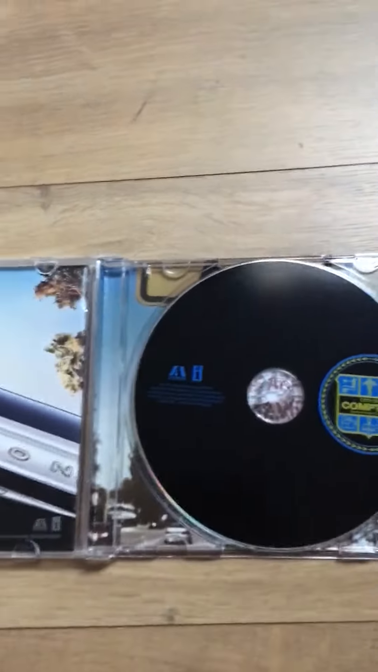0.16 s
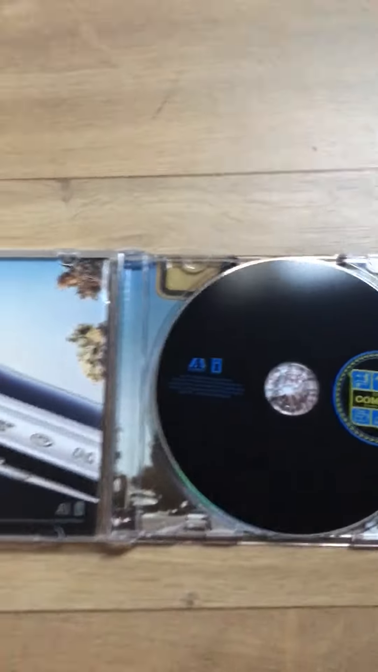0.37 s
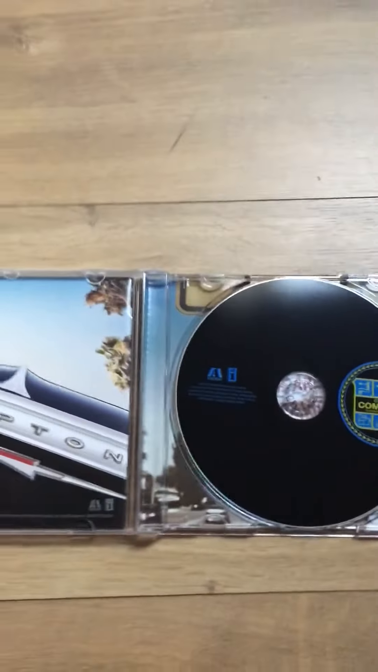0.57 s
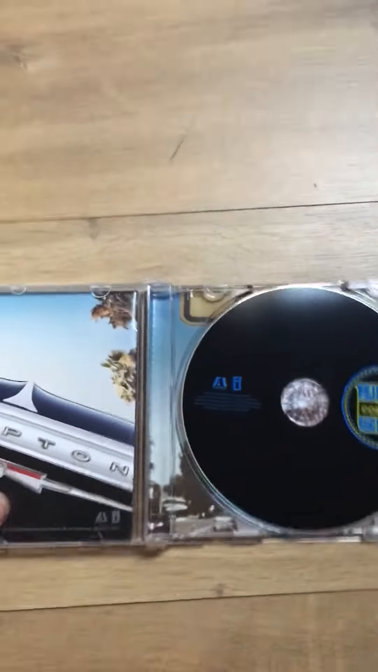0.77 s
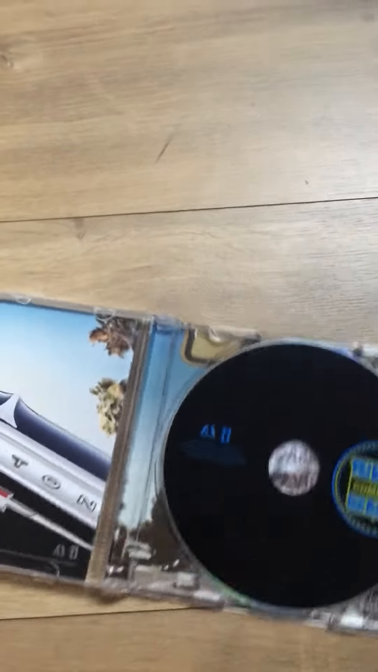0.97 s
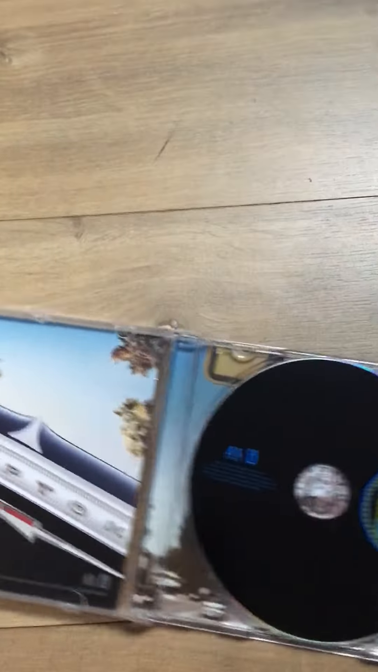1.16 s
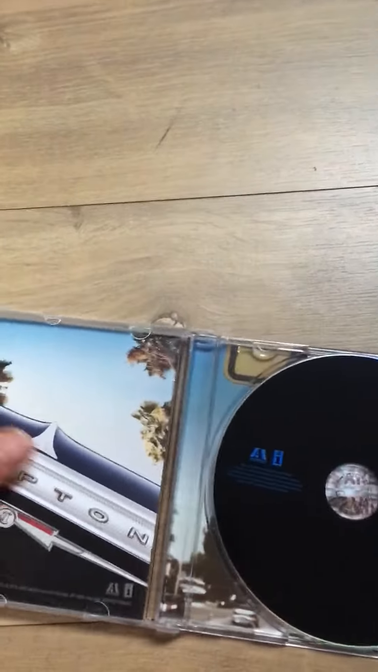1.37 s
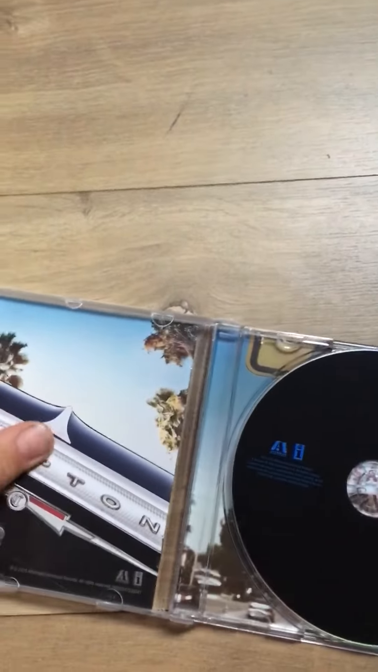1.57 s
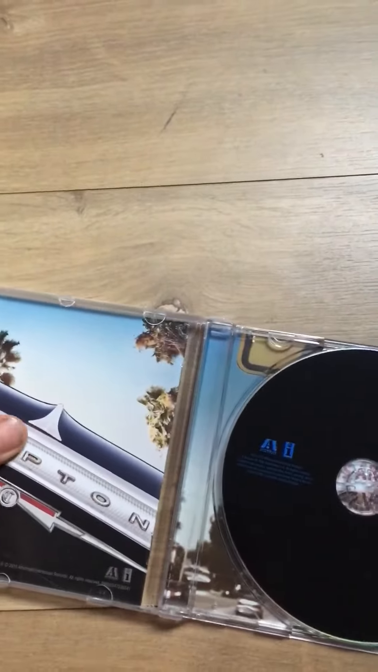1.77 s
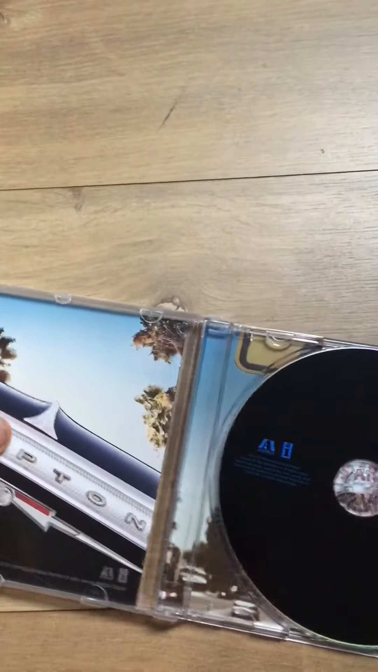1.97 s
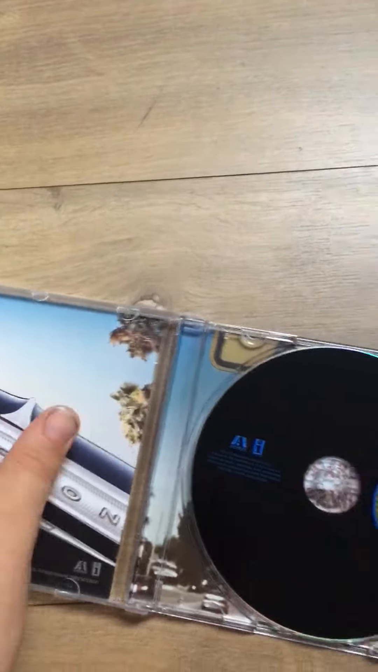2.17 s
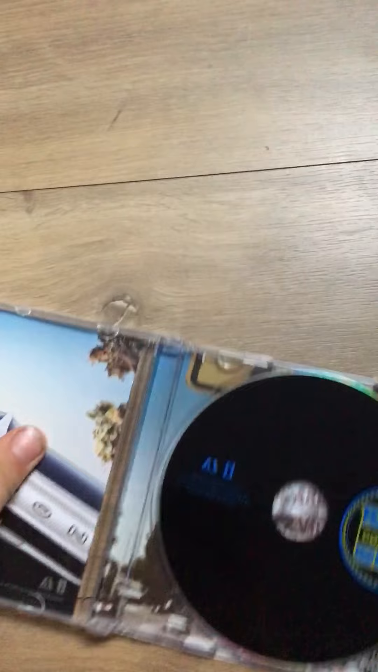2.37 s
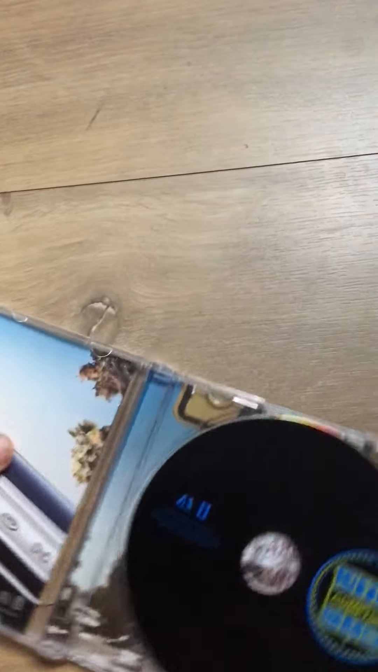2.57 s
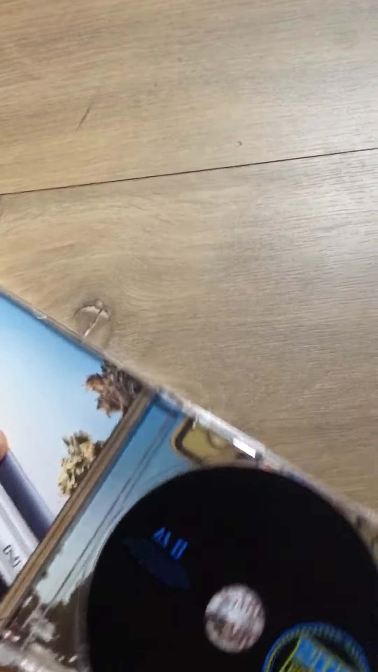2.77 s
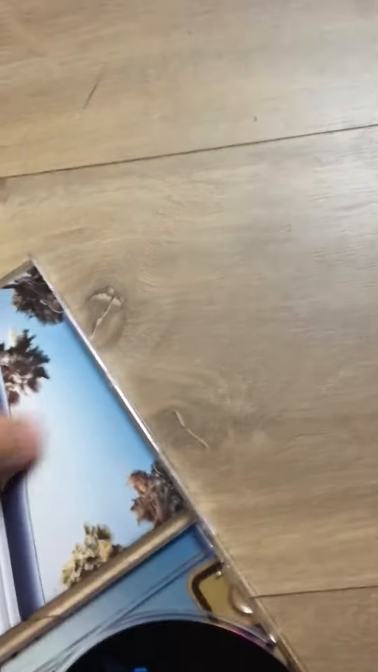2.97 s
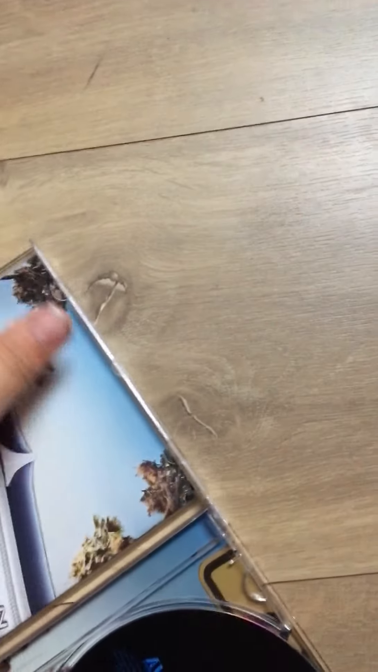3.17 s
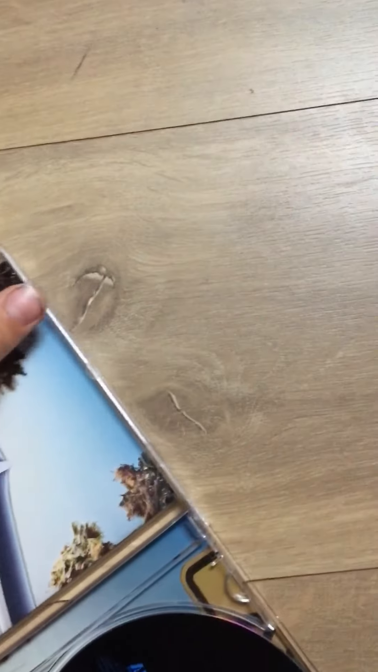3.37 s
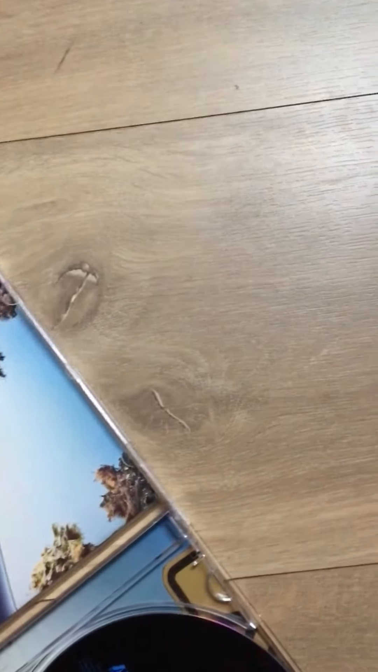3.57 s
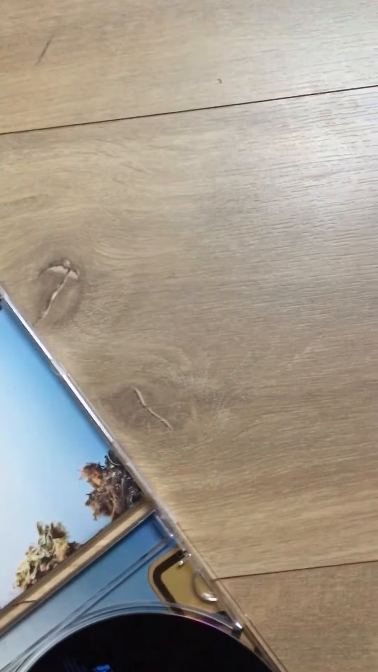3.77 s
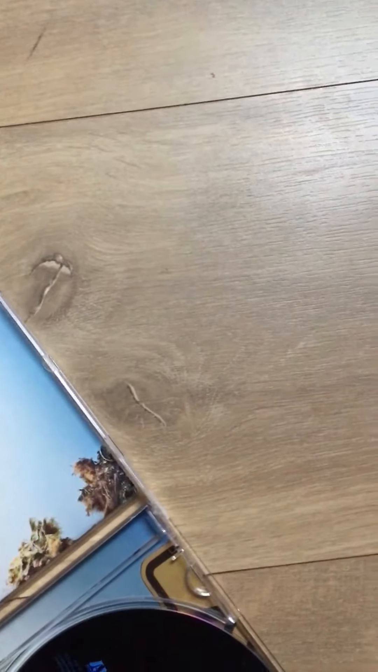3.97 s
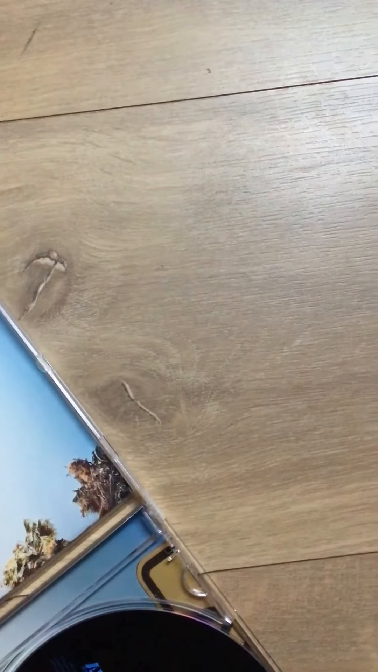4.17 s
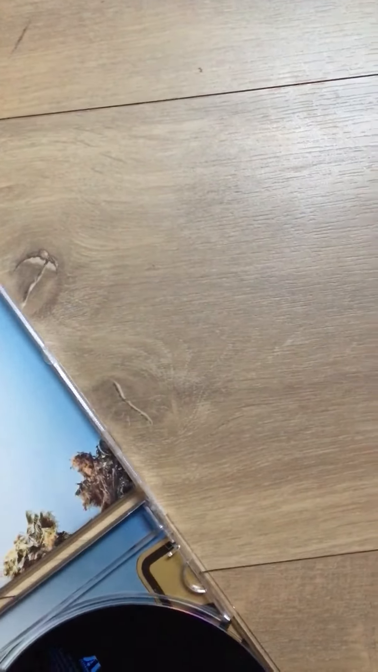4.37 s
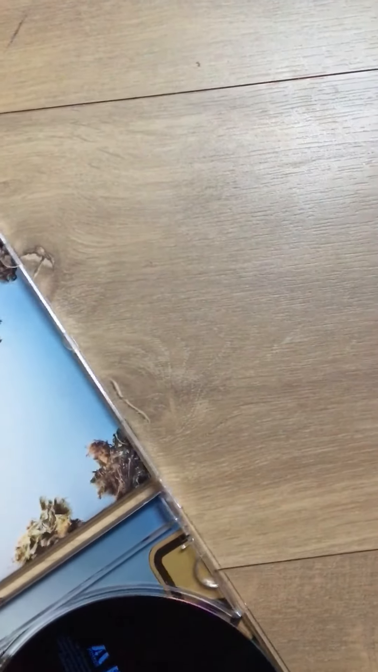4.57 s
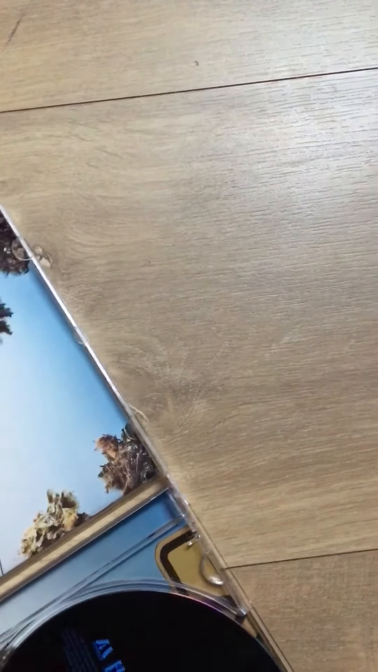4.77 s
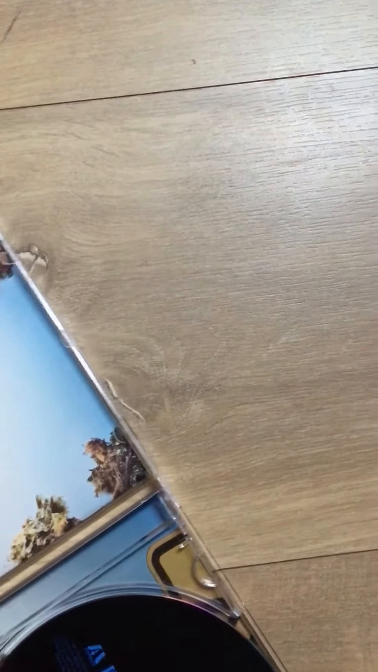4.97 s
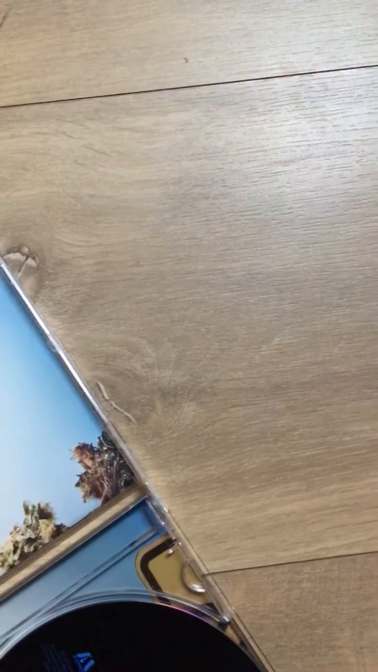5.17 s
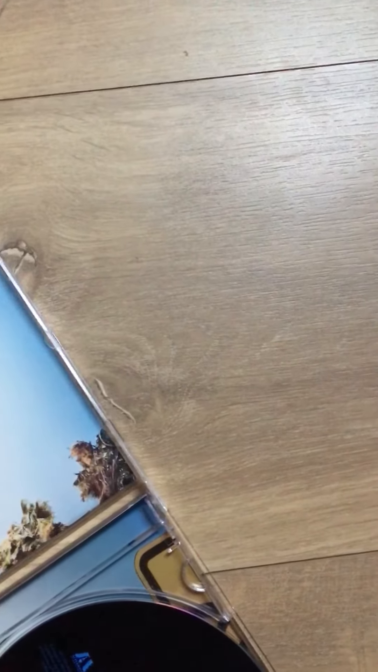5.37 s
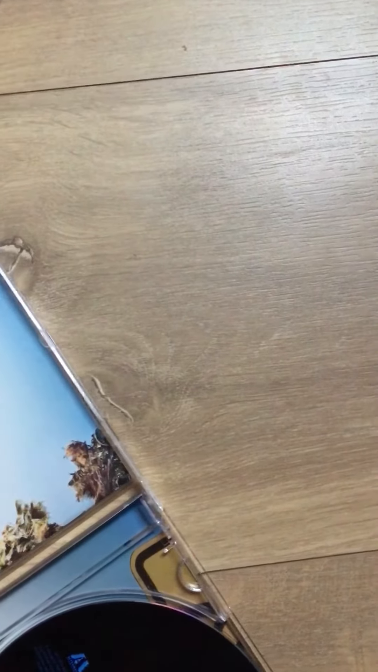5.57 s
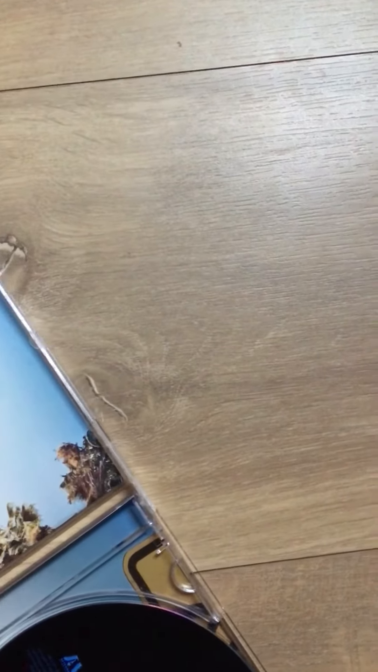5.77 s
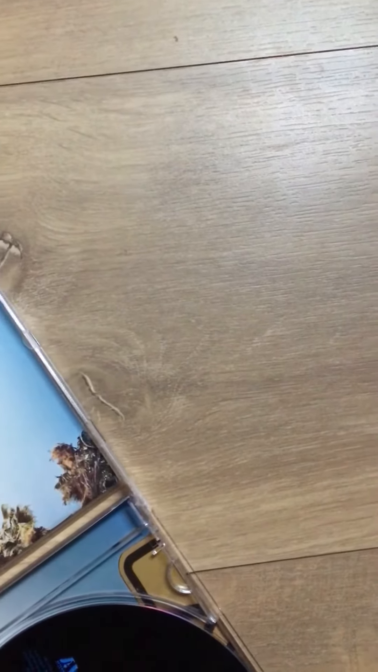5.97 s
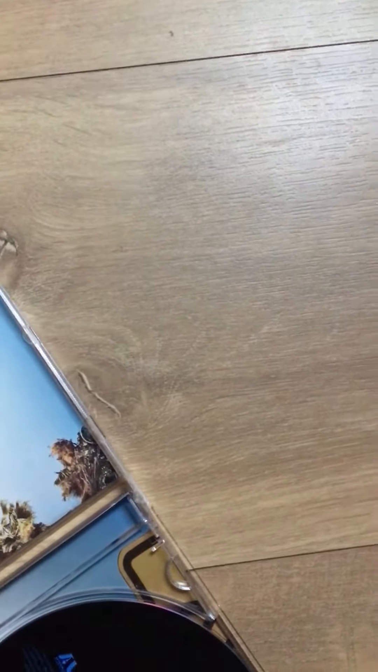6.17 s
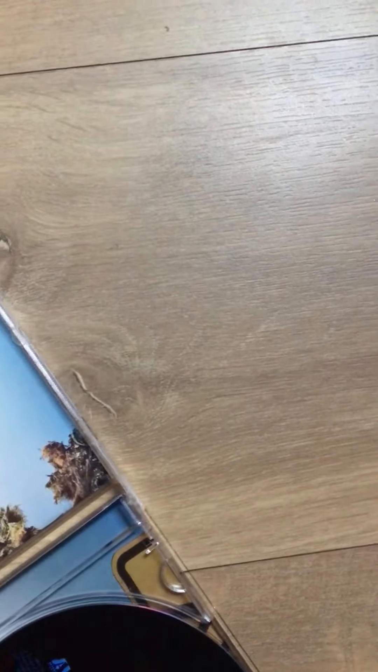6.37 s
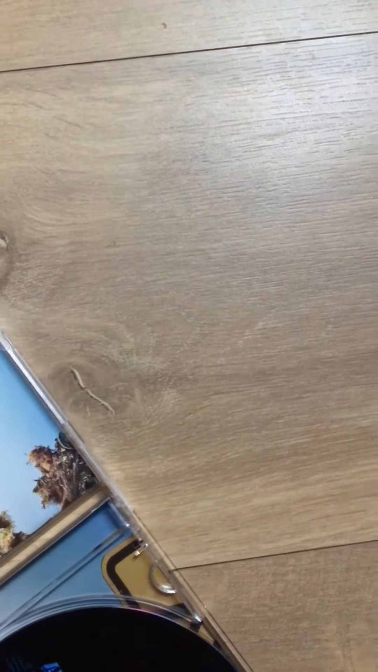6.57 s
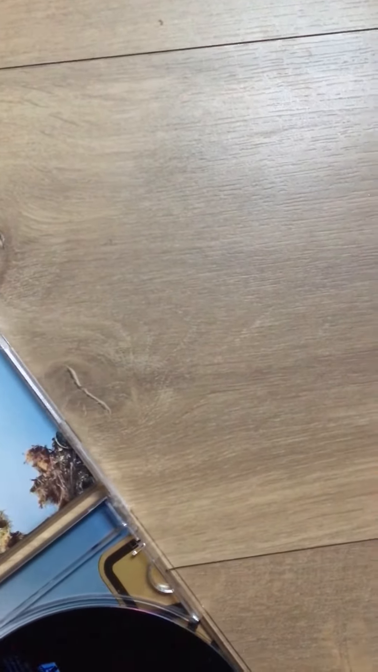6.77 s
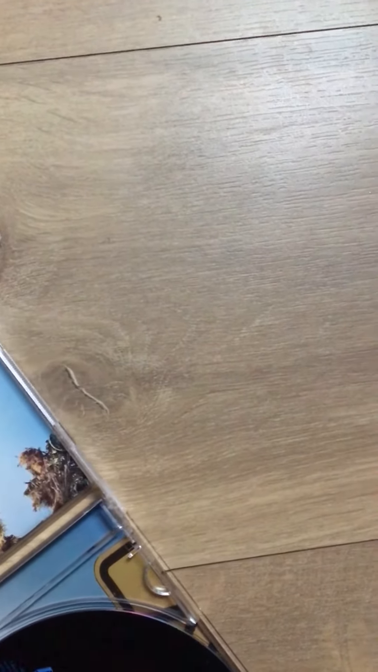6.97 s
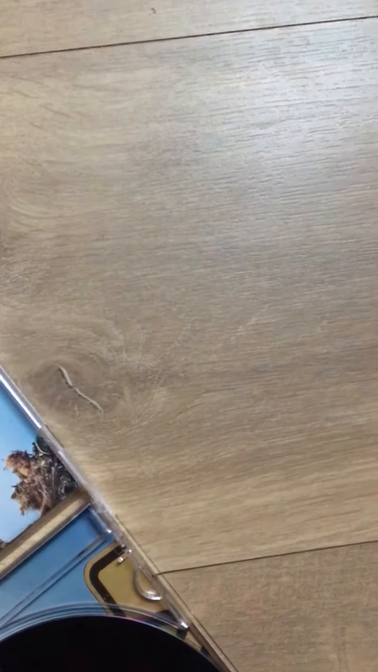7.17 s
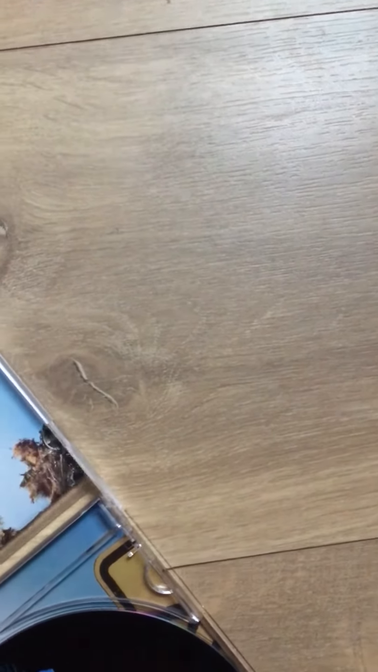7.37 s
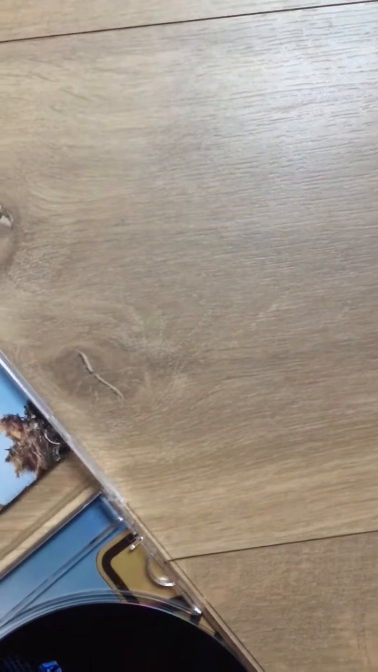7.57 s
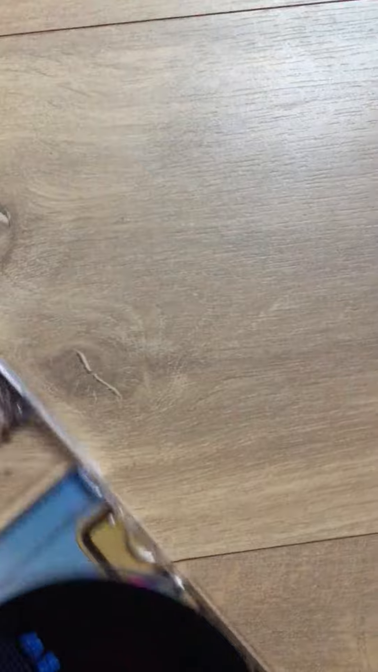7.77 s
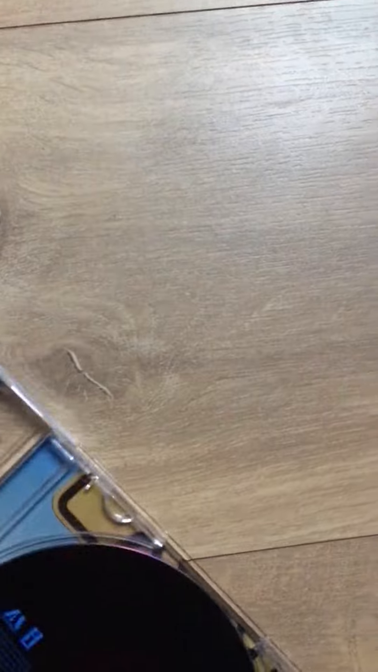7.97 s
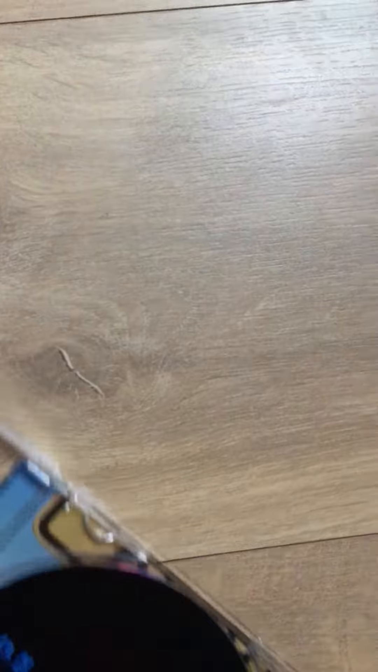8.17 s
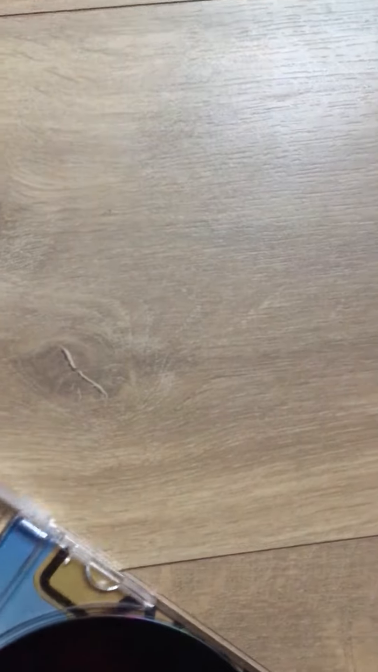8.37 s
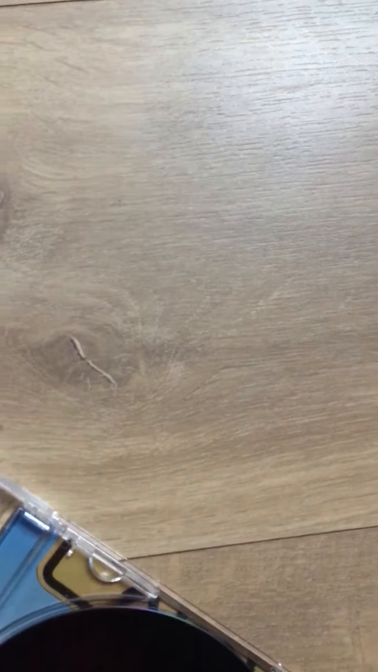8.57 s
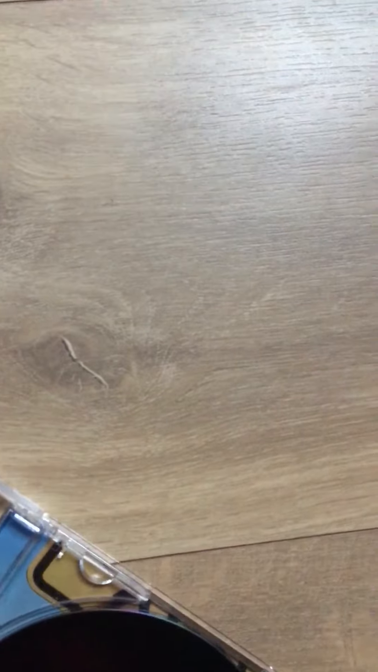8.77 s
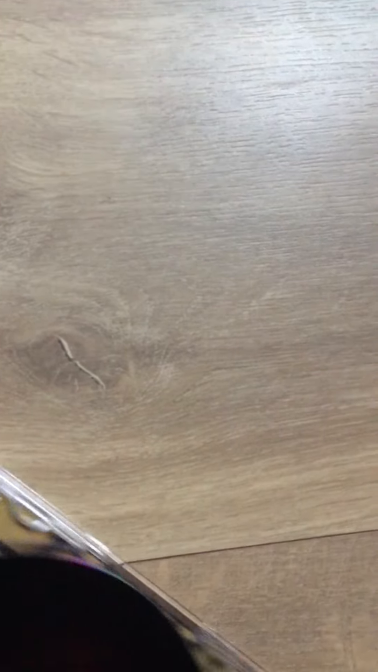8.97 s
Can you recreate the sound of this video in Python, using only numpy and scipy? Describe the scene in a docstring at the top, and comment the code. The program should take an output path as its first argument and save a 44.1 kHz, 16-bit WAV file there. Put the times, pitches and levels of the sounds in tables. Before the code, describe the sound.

Close up in a small, quiet room, a plastic disc case slides on a hard floor, first in brief strokes and then in a longer, louder push. Its tabs and hinge click irregularly while a paper booklet rubs softly against the plastic. A loud click stands out near the end, and fuller scrapes of paper and case follow. Soft knocks, faint ticking and a low room rumble lie underneath.

```python
"""An open plastic disc case is pushed over a laminate floor in short strokes and one long push.
Grit under it, and its paper booklet as fingers work it free, rub the plastic and make it ring.
Fingers and case bump the floor, tabs and hinge click, the case creaks and a slipping edge squeaks.
A small, quiet room echoes and rumbles, and the phone's microphone picks up faint ticks and hiss."""
import sys
import numpy as np
from scipy import signal
from scipy.fft import rfft, irfft, next_fast_len
from scipy.io import wavfile
from scipy.ndimage import uniform_filter1d, map_coordinates

SR = 44100
rng = np.random.default_rng(int(sys.argv[2]) if len(sys.argv) > 2 else 0)


def persist_wave(psi):
    """Save psi, clipped to +-1, as 16-bit WAV."""
    counts = np.round(np.clip(psi, -1, 1) * 32767).astype(np.int16)
    wavfile.write(sys.argv[1], SR, np.atleast_2d(counts).T)


N = 398223
NOISE_TOP_HZ = 15750  # upper limit of grit, hiss and ticks
CHATTER_S = 0.023  # typical time for a knock or click to fade by 60 dB


def amp(db):
    """Turn decibels into a number to multiply by."""
    return 10 ** (np.asarray(db) / 20)


def unit(x):
    """Scale x to an average (rms) level of 1."""
    return x / np.sqrt(np.mean(np.abs(x) ** 2) + 1e-20)


def along(points, hz):
    """Read between (pitch_hz, value) points, with octaves evenly spaced."""
    pitches, values = np.transpose(points)
    return np.interp(np.log(hz + 1), np.log(pitches + 1), values)


def wobble(rate):
    """A smooth curve through `rate` random values a second."""
    return map_coordinates(rng.standard_normal(int(N * rate / SR) + 4), [np.arange(N) * rate / SR])


def filtered(x, response):
    """Turn each frequency in x up or down by response(hz)."""
    size = next_fast_len(x.shape[-1] + 4096)
    return irfft(rfft(x, size) * response(np.fft.rfftfreq(size, 1 / SR)), size)[..., :x.shape[-1]]


def above(hz, edge_hz):
    """A steep filter that lets the highs through."""
    return (1j * hz / (edge_hz + 1j * hz)) ** 3


def ringing(table, scatter_db=0):
    """A filter that rings at an object's own pitches; scatter_db varies their strengths by chance."""
    gains = amp(scatter_db * rng.standard_normal(len(table)))
    return lambda hz: sum(
        (-1) ** k * gain * amp(db) * 1j * hz * width / (pitch ** 2 - hz ** 2 + 1j * hz * width)
        for k, (gain, (pitch, width, db)) in enumerate(zip(gains, table)))


def patchy(x, depth_db, bands, frames):
    """The touching spot keeps changing, so single pitches swell and fade while the whole level holds."""
    spectrum = signal.stft(x, nperseg=256)[2]
    patches = uniform_filter1d(rng.standard_normal(spectrum.shape), bands, axis=0)
    patches = uniform_filter1d(patches, frames, axis=1)
    patches -= uniform_filter1d(patches, 8 * bands, axis=0)
    return signal.istft(spectrum * amp(depth_db * unit(patches)), nperseg=256)[1][:len(x)]


def grains(per_second, spread_db):
    """Scattered tiny hits, a few much larger than the rest."""
    hit = rng.random(N) < per_second / SR
    return hit * rng.standard_normal(N) * amp(spread_db * np.minimum(rng.exponential(size=N), 4))


def chatter(t, fade_s):
    """A sharp blow and a dying rattle that hold all frequencies about evenly."""
    fade_db = -60 * t / max(fade_s, .002)
    burst = rng.standard_normal(len(t)) * amp(fade_db)
    burst[0] = 6  # the blow
    spectrum = rfft(burst, 2 * len(t))
    evened = irfft(spectrum / np.abs(spectrum) ** .9)[:len(t)]
    return evened * amp(fade_db / 2)


# The case sounds at level_db; adding floor_db or edge_db gives the level of the floor or the case's edge.
# The hand resting on case and booklet: time_s, level_db, floor_db, edge_db
RESTING_HAND = [(0, -84, -7, 5), (0.3, -80, 2, 1), (0.62, -68, -11, 2.5), (1.35, -70, 3, 0),
                (1.9, -85, -7, 3), (2.2, -78.5, -3, 0.5), (3.3, -72, -1, 6), (3.75, -73.5, -5, -1),
                (4.2, -79.5, 5, 5), (4.6, -70, -5, 3), (5.2, -73, 5, -1), (5.6, -80.5, 1, 2.5),
                (6.0, -74, 5.5, -4.5), (6.3, -74.5, -7, 0.5), (6.7, -75, -4.5, -1.5), (7.2, -77.5, 2, 2),
                (7.6, -66, -5, 4.5), (8.75, -61.5, -11, 3), (9.03, -52.5, -10, 21)]
# The long push, which stumbles, speeds up and stops dead: time_s, level_db, floor_db, edge_db
LONG_PUSH = [(2.24, -80, -4, -8), (2.27, -46.5, -11.5, -2.5), (2.3, -36.5, -15, -2),
             (2.315, -39.5, -14, -3), (2.369, -34.5, -18, -3), (2.39, -43.5, -6, -3), (2.455, -45, -14, -4),
             (2.514, -36.5, -10, -5.5), (2.59, -35, -14, -3), (2.665, -40.5, -12, -5),
             (2.685, -35, -14, -6), (2.77, -31, -16, -1), (2.81, -28, -15, 3), (2.885, -27.5, -16.5, 3.5),
             (2.905, -28, -11.5, -1.5), (2.962, -30.5, -13, -1.5), (2.978, -55, -14, -10)]
# Case on floor, finger and paper on plastic: fastest_s, rise_s, fall_s, level_db, floor_db, edge_db
SHORT_STROKES = [(0.0, .02, 0.13, -70.5, -12, 6.5), (0.26, .04, 0.068, -81, 14, 2),
                 (0.662, 0.034, 0.12, -56, 3, -3.5), (0.77, 0.033, 0.027, -41.5, -15, -7),
                 (0.877, 0.12, 0.2, -33.5, -16.5, -4), (1.125, 0.036, .04, -33, -17, -8),
                 (1.179, 0.088, 0.086, -32, -11.5, -5.5), (1.36, 0.036, 0.09, -64.5, 1, -14),
                 (1.414, 0.024, 0.084, -42.5, -8.5, -5.5), (1.475, 0.021, 0.033, -48.5, -6, -6),
                 (1.58, 0.042, 0.072, -63.5, 4.5, -7), (1.99, 0.053, 0.051, -39.5, -7, -5),
                 (3.026, .024, 0.027, -41.5, -11, -10), (3.1, 0.077, 0.18, -52.5, -8.5, -4),
                 (3.212, .02, 0.026, -48, -7, -3.5), (3.324, 0.035, 0.075, -58, 0.5, -1),
                 (3.421, .038, 0.037, -58.5, 4.5, -2), (3.469, .018, 0.013, -54.5, 5, 3.5),
                 (3.522, .014, 0.011, -64.5, 2, 11), (3.63, 0.037, 0.045, -57.5, 2, -2.5),
                 (3.7, .016, 0.013, -58.5, 0, 2), (3.765, 0.0096, 0.018, -64, -6, 3),
                 (3.799, .02, 0.029, -60, 5.5, -6), (3.969, 0.017, 0.012, -57.5, -1, 1),
                 (4.074, .02, .02, -64, -5, -9), (4.133, .032, .032, -51, -3.5, -5.5),
                 (4.37, 0.12, 0.049, -46.5, -5.5, -4), (4.509, 0.046, 0.059, -35.5, -12, -8),
                 (4.656, 0.018, 0.055, -42, -9, -9), (4.63, .02, 0.014, -56, 2.5, -2),
                 (4.711, .04, 0.022, -48, -7, -4.5), (4.812, 0.02, 0.016, -59, -6, 1.5),
                 (4.853, 0.028, 0.016, -52.5, -5.5, -5), (4.905, 0.024, 0.016, -59, -6, -3),
                 (4.99, .045, 0.043, -47.5, -8, -7.5), (5.127, 0.037, 0.042, -72, 11.5, 10),
                 (5.293, 0.032, 0.048, -65, 1, 10.5), (5.42, .03, .08, -69, -6, 2.5),
                 (5.507, 0.029, 0.028, -50, -10.5, -9.5), (5.62, .012, 0.0098, -65, -14, 3),
                 (5.68, 0.054, 0.063, -68, -4.5, 1), (5.765, 0.059, .04, -54.5, -6.5, -5.5),
                 (6.016, .018, 0.014, -56, -11, -9), (6.13, 0.033, 0.052, -57, -3, -2),
                 (6.167, .008, 0.0087, -56, -14, 4.5), (6.214, 0.0086, 0.0094, -60.5, 4.5, -8),
                 (6.367, 0.016, 0.0114, -44, -3.5, 0), (6.433, 0.032, 0.023, -52, -6.5, -3),
                 (6.48, .14, 0.098, -56.5, -11, -7), (6.621, 0.014, 0.014, -62, -17, 2.5),
                 (6.715, 0.05, 0.044, -68, -5, 1), (6.824, 0.036, 0.027, -57, -8, 0),
                 (7.09, 0.018, .02, -62, -12, -10), (7.112, 0.026, 0.079, -58.5, -6, -2),
                 (7.0, 0.015, 0.014, -65, -6.5, -8), (7.196, 0.0093, 0.009, -55.5, -2.5, -6),
                 (7.348, .005, 0.0094, -39, -5, 3), (7.365, 0.073, 0.036, -58.5, -3, -6),
                 (7.488, 0.041, 0.076, -56, -2, 9.5), (7.642, 0.066, 0.04, -54, -1, -3.5),
                 (7.704, 0.017, 0.012, -46.5, -2, -7), (7.74, 0.039, 0.17, -36.5, -10, -4.5),
                 (7.92, 0.023, 0.021, -53.5, 2, -6), (7.952, 0.03, .033, -42, -7, -2.5),
                 (8.02, 0.13, 0.21, -52, -2, -20), (8.033, 0.016, 0.015, -45, -5, -6),
                 (8.104, 0.016, 0.0095, -46, -4, -7.5), (8.145, 0.019, .025, -49.5, -1.5, -10),
                 (8.207, 0.083, 0.18, -37.5, -7.5, -5.5), (8.376, .01, 0.023, -40, -7, -0.5),
                 (8.425, 0.053, .04, -55, -3.5, 1), (8.49, 0.038, 0.074, -57, -1, -19),
                 (8.58, .03, 0.035, -55.5, -8, -7), (8.68, 0.089, 0.06, -62, -12, -18),
                 (8.651, 0.022, 0.023, -58, 7, 2), (8.78, 0.034, 0.028, -53.5, -7.5, 4),
                 (8.879, 0.082, 0.55, -32.5, -16, -6.5), (8.95, .011, 0.012, -27, -10, 4.5)]
def rubbing_strengths():
    """How hard floor, case and edge are rubbed: the powers of hand, push and strokes add up."""
    t = np.arange(N) / SR
    power = np.zeros((3, N))
    for curve, waver_db in ((RESTING_HAND, 3 * wobble(14)), (LONG_PUSH, 0.89 * wobble(24.92))):
        times, *columns = np.transpose(curve)
        level_db, floor_db, edge_db = [np.interp(t, times, column) for column in columns]
        active = (t >= times[0]) & (t <= times[-1])
        power += amp(waver_db + [level_db + floor_db, level_db, level_db + edge_db]) ** 2 * active
    for fastest_s, rise_s, fall_s, level_db, floor_db, edge_db in SHORT_STROKES:
        span = slice(max(round((fastest_s - rise_s) * SR), 0), round((fastest_s + fall_s) * SR))
        slope_s = np.where(t[span] < fastest_s, rise_s, fall_s)
        flatness = 1 + slope_s / 0.3  # long strokes hold their speed more than quick flicks
        from_peak = np.clip(np.abs(t[span] - fastest_s) / slope_s, 0, 1) ** flatness
        peaks = amp([[level_db + floor_db], [level_db], [level_db + edge_db]])
        power[:, span] += (peaks * np.cos(np.pi / 2 * from_peak) ** 2) ** 2
    return np.sqrt(power)


# The pitches at which each part rings: pitch_hz, width_hz, level_db
FLOOR_RINGS = [(392, 480, -11), (698, 347, -1.5), (990, 354, -0.5)]
HELD_CASE_RINGS = [(1410, 164, 4.46), (1930, 720, 3.8), (2575, 724, 4.2), (3160, 250, 5.84),
                   (3550, 406, 1.2)]
FREE_CASE_RINGS = [(1246, 190, -1.5), (1554, 830, -5), (2230, 770, -2.5), (2940, 560, -5.5),
                   (3470, 310, -4)]  # the case when no longer held down
EDGE_RINGS = [(4360, 590, 3.5), (5450, 400, 3.5), (6220, 870, 2.5), (8680, 2540, -1.5), (9265, 880, 2),
              (11730, 1300, -15), (14270, 2200, -14)]
def rubbing(let_go_s=7.6):
    """Grit and surfaces that catch and slip make the floor, the case and its edge ring."""
    floor_gain, case_gain, edge_gain = rubbing_strengths()
    grit = unit(rng.standard_normal(N)) + 0.5 * unit(grains(2500, spread_db=2.5))
    grit = patchy(grit * amp(1.1 * wobble(180)), depth_db=1.9, bands=2, frames=12)  # the stroke judders
    grit = patchy(grit, depth_db=0.75, bands=4, frames=50)  # each move grips the case somewhere else
    lightness = np.clip(amp(-63) / case_gain, 0, 1)  # light touches crackle, heavy slides smear it
    crackle = 0.57 * lightness * unit(grains(110, spread_db=1.0))
    grit = filtered(grit + crackle, lambda hz: hz < NOISE_TOP_HZ)
    floor, held, free, edge = [unit(filtered(grit, ringing(part)))
                               for part in (FLOOR_RINGS, HELD_CASE_RINGS, FREE_CASE_RINGS, EDGE_RINGS)]
    case = np.where(np.arange(N) < let_go_s * SR, held, free)
    return floor_gain * floor - case_gain * case + edge_gain * edge


# How long the room's echo takes to fade by 60 dB: pitch_hz, fade_s
ECHO_FADES = [(300, 0.59), (1500, 0.22), (5000, 0.2), (14000, 0.12)]
def room_echo(x):
    """The small room answers each sound; low pitches linger longest."""
    hz, t, spectrum = signal.stft(rng.standard_normal(SR // 3), SR, nperseg=256)
    fade = amp(-60 * t / along(ECHO_FADES, hz)[:, None])
    tail = signal.istft(spectrum * fade, SR, nperseg=256)[1]
    delayed = np.pad(x, (200, 0))
    return signal.fftconvolve(delayed, tail / np.linalg.norm(tail))[:N]


# The balance of lows and highs in the background noise: pitch_hz, relative_db
AIR_TONE = [(21, -40.5), (36, 0), (70, 5), (268, -1), (532, -10), (840, -21), (1360, -15.5), (2210, -20),
            (4850, -32.5), (6090, -26), (15600, -26.5)]
def air():
    """The room's low rumble, swelling as the phone is handled, and the microphone's hiss."""
    noise = unit(filtered(rng.standard_normal(N),
                          lambda hz: amp(along(AIR_TONE, hz)) * (hz < NOISE_TOP_HZ)))
    rumble = filtered(noise, lambda hz: 1 / (1 + (hz / 400) ** 2))
    hiss = noise - rumble
    swell = amp(1.3 * (wobble(4) + wobble(19) - 1))
    return amp(-67 + 0.95 * wobble(2.7)) * (hiss + swell * rumble)


def ticking(gap_s=.033354, steady_from_s=5.2817, steady_to_s=7.4):
    """Faint ticks, perhaps the phone's lens hunting for focus: uneven, but steady for a while."""
    end_s = N / SR
    uneven = np.cumsum(gap_s * (1 + .2 * rng.standard_normal(int(end_s / gap_s))))
    uneven = uneven[((uneven < steady_from_s) | (uneven > steady_to_s)) & (uneven < end_s - gap_s)]
    times = np.append(uneven, np.arange(steady_from_s, steady_to_s, gap_s))
    pulses = np.zeros(N)
    pulses[np.round(times * SR).astype(int)] = amp(-47 + 1.5 * rng.standard_normal(len(times)))
    return filtered(pulses, lambda hz: above(hz, edge_hz=5500) * (hz < NOISE_TOP_HZ))


# Soft bumps of finger and case on the floor: start_s, level_db, pitch_hz
FLOOR_BUMPS = [(0.14, -43.5, 256), (0.226, -44.5, 326), (0.966, -48.5, 200), (1.613, -47, 164),
               (1.907, -50, 147), (2.528, -40, 278), (3.326, -43, 241), (4.253, -49, 293),
               (5.696, -48, 145), (6.141, -47.5, 137), (7.349, -37.5, 298), (7.468, -43, 148)]
def bumps():
    """A soft bump draws a brief low note and a small knock from the floor."""
    out, t = np.zeros(N + SR), np.arange(SR // 10) / SR
    swell = t / 0.0038 * np.exp(1 - t / 0.0025)
    for start_s, level_db, pitch_hz in FLOOR_BUMPS:
        note = swell * np.sin(2 * np.pi * pitch_hz * t)
        knock = filtered(chatter(t, CHATTER_S), ringing(FLOOR_RINGS, scatter_db=3))
        knock /= np.abs(knock).max()
        out[round(start_s * SR):][:len(t)] += amp(level_db) * (note + amp(-13.5) * knock)
    return out[:N]


# Clicks of tabs, hinge and paper edge: start_s, level_db, floor_db, edge_db
CASE_CLICKS = [(0.207, -32.5, 14, -2), (0.418, -52.5, 10, -5), (0.651, -40, 0, -9), (0.675, -38, 10, -14),
               (1.401, -31, -5, -5), (1.514, -29.5, -19, 3.5), (1.615, -43.5, -7, -9), (1.63, -46, 14, -8),
               (1.834, -49.5, -9, -2), (1.905, -43.5, 1, -3), (1.948, -45, -10, 6), (2.209, -50.5, -14, -7),
               (3.238, -35, -4, -1.5), (3.284, -38.5, -11, 9), (3.295, -41, -8, 0), (3.305, -43, -10, 2),
               (3.314, -43, -10, 0), (3.326, -28.5, -1, 5), (3.356, -37, -9, -1), (3.377, -50, -2, 0),
               (3.397, -29.5, -6, -3.5), (3.406, -42, -5, -6), (3.414, -32.5, -13, -2),
               (3.454, -37, -13, -7), (3.465, -32, -19, -2), (3.607, -41, 7, -8), (3.785, -34, -19, -10),
               (3.799, -40.5, -17, 1), (3.841, -45, 3, -14), (3.962, -36.5, 1, 5.5), (4.085, -44.5, 14, -4),
               (4.258, -34.5, 5, 1), (4.441, -43, 22, -5), (4.613, -35.5, 0, -12), (4.645, -32, -13, -11),
               (4.723, -35.5, -4, -3), (5.021, -24.5, 7.5, 10), (5.035, -40.5, -3, -2), (5.31, -45, 5, -2),
               (5.382, -44, -18, -3), (5.3905, -14.5, -4.5, -4.5), (5.784, -30.5, 0.5, 6),
               (5.8, -43, -14, -16), (5.822, -39.5, -2, -23), (5.98, -45.5, -3, -2),
               (6.067, -28.5, -8, -0.5), (6.096, -46, -8, 13), (6.103, -20.5, -1.5, -0.5),
               (6.142, -40, -14, 5), (6.166, -39, -10, 8), (6.26, -41.5, 3.5, -13), (6.374, -30, -9, -12),
               (6.612, -41, -14, 11), (6.834, -43, -3, 7), (7.111, -30, -26, 3.5), (7.189, -41, -18, -4.5),
               (7.342, -30, -9, 2), (7.386, -36, -7, -2), (7.438, -38, -2, -9), (7.4644, -1, -12, 11.5),
               (7.694, -35, -3, -3), (7.727, -24.5, -16, -2), (7.994, -28, -12, -11),
               (8.552, -34.5, 1.5, -15), (8.646, -36, -13, -11), (8.806, -33, -1, 2)]
def clicks():
    """Each click rings floor, case and edge; the light edge settles first."""
    out, t = np.zeros(N + SR), np.arange(SR // 10) / SR
    for start_s, level_db, floor_db, edge_db in CASE_CLICKS:
        fade_s = CHATTER_S * amp(1.5 * rng.standard_normal())
        slow, quick = chatter(t, fade_s), chatter(t, .65 * fade_s)
        floor = unit(filtered(slow, ringing(FLOOR_RINGS[1:], scatter_db=1.5)))
        case = unit(filtered(slow, ringing(HELD_CASE_RINGS, scatter_db=1.5)))
        edge = unit(filtered(quick, ringing(EDGE_RINGS, scatter_db=1.5)))
        crack = unit(filtered(quick, lambda hz: above(hz, edge_hz=11000)))
        click = amp(floor_db) * floor - case + amp(edge_db) * (edge + amp(-15) * crack)
        out[round((start_s + .0014) * SR):][:len(t)] += amp(level_db) * click / np.abs(click).max()
    return filtered(out[:N], lambda hz: above(hz, edge_hz=220))


def creak(start_s=1.572, length_s=.045, slips_per_second=115):
    """The case, pressed down, slips on the floor in a short run of faint, uneven, growing jerks."""
    elapsed_s = np.arange(0, length_s, 1 / slips_per_second)
    time_jitter, level_jitter = rng.standard_normal((len(elapsed_s), 2)).T
    when = np.round((start_s + elapsed_s + 0.0012 * time_jitter) * SR).astype(int)
    slips = np.zeros(N)
    slips[when] = amp(-46 + 4 * elapsed_s / length_s + 1.5 * level_jitter)
    return filtered(slips, lambda hz: amp(9) * ringing(FLOOR_RINGS[1:])(hz) + ringing(EDGE_RINGS)(hz))


# Brief tones as an edge slips: start_s, level_db, pitch_hz, length_s
EDGE_SQUEAKS = [(7.344, -28, 2000, 0.0044), (7.346, -29, 2026, 0.011), (7.7754, -23, 2320, 0.00326)]
def squeaks():
    """A slipping edge sings one pitch for a few thousandths of a second."""
    out, t = np.zeros(N + SR), np.arange(SR // 20) / SR
    for start_s, level_db, pitch_hz, length_s in EDGE_SQUEAKS:
        swell = np.sin(np.pi * np.clip(t / length_s, 0, 1)) ** 0.65
        out[round(start_s * SR):][:len(t)] += amp(level_db) * swell * np.sin(2 * np.pi * pitch_hz * t)
    return out[:N]


def scene():
    """Mix the handling sounds and their echo with squeaks, ticks and quiet air, in one channel."""
    handling = rubbing() + clicks() + creak() + bumps()
    return (handling + amp(-16) * room_echo(handling) + squeaks() + ticking() + air())[None]


def record(dry):
    """The phone cuts off the very highest treble."""
    return filtered(dry, lambda hz: hz < 16800)


dry = scene()
out = record(dry)
persist_wave(out)
```